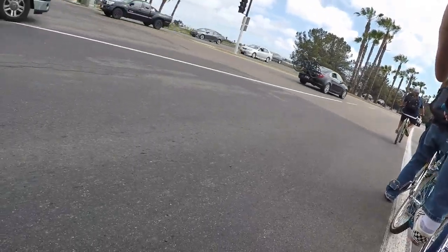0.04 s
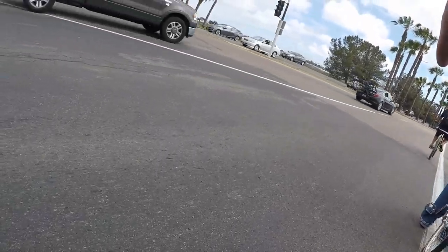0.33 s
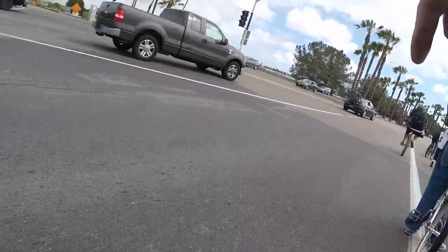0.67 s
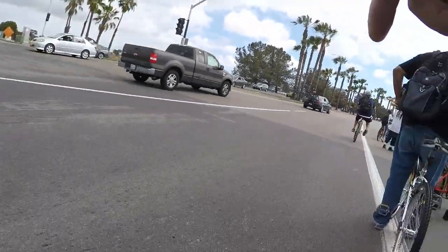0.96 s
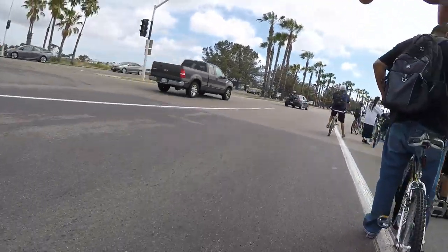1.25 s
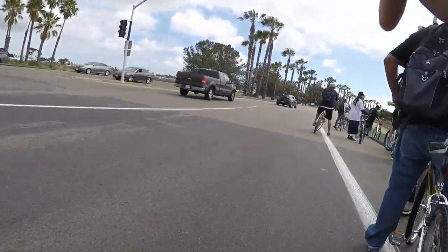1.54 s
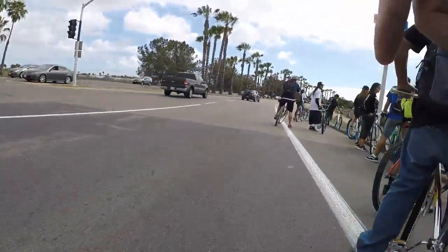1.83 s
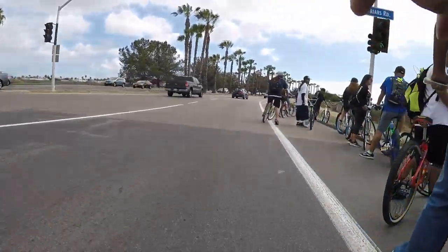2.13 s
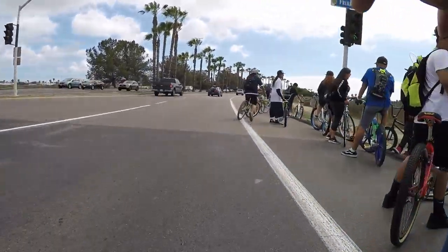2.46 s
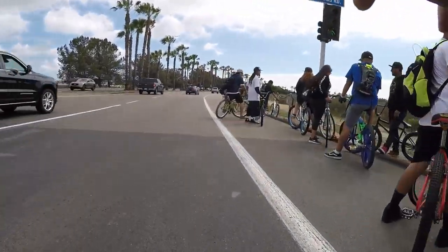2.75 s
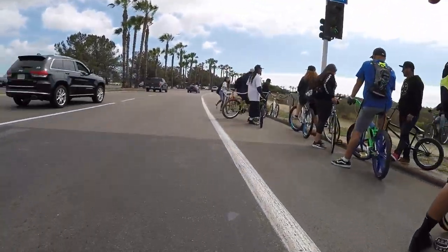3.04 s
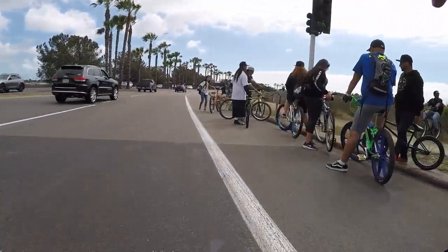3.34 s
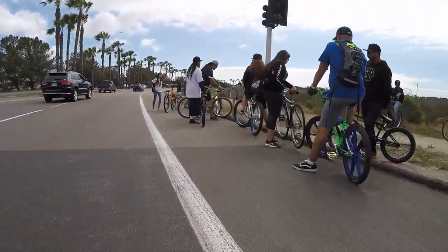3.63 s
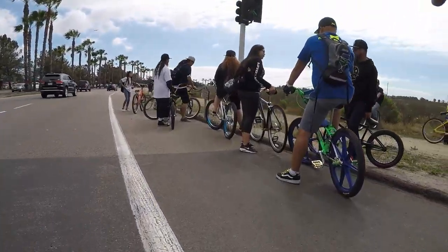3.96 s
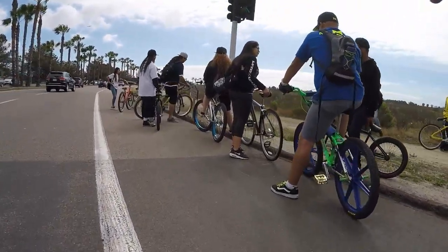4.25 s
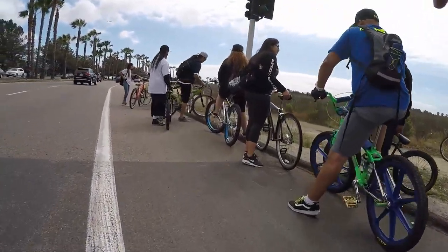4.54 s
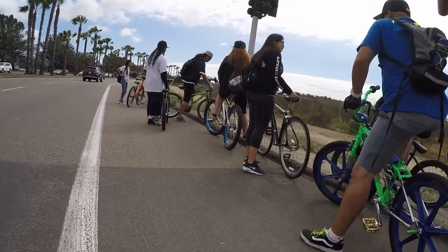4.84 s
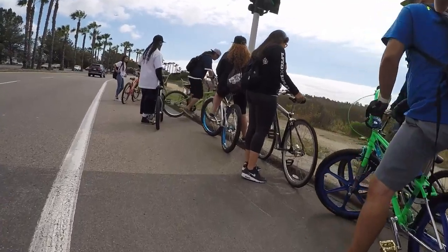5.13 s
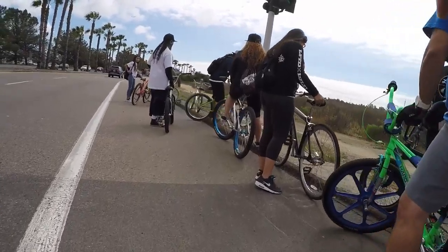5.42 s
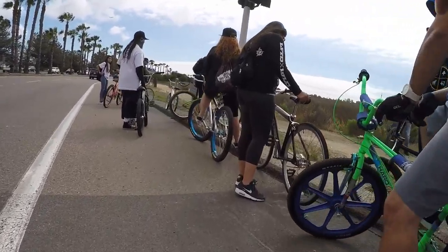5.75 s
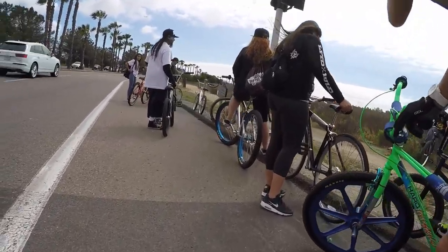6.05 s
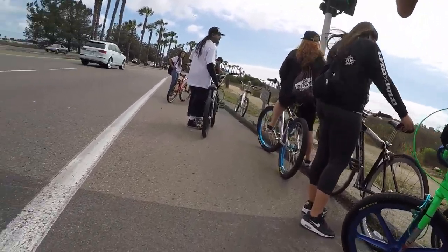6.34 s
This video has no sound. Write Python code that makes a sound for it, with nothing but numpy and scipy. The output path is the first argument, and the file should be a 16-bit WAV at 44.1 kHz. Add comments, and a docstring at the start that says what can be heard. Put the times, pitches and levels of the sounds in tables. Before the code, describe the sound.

Deep, fluttering wind buffets a microphone mounted on a coasting bicycle. Close by, the freewheel clicks with a slight metallic ring, accelerating to a steady buzz and then easing back to slower, hollower ticks. The brake squeaks faintly at the start, and one tiny rattle follows as the wheel reaches full speed. Tyres hum quietly on asphalt, and far-off road traffic hisses, a little louder early on.

```python
"""A bicycle freewheel ticks as the bicycle coasts past a junction, speeding up and slowing again.
Its pawls (small catches) snap over the ratchet teeth and make the hub and frame ring.
The brake squeaks faintly near the start, and a loose part rattles once.
Wind shakes the case of a small camera on the bicycle into a deep rumble.
Underneath, the tyres drone on the asphalt and distant traffic hisses."""
import sys
import numpy as np
from scipy import signal
from scipy.fft import rfft, irfft, next_fast_len
from scipy.io import wavfile
from scipy.ndimage import uniform_filter1d

SR = 44100
rng = np.random.default_rng(int(sys.argv[2]) if len(sys.argv) > 2 else 0)


def file_out(sig):
    """Save sig as 16-bit WAV at sys.argv[1]."""
    # one column per channel
    cols = np.atleast_2d(sig).T
    # limit, then scale
    lim = np.clip(cols, -1, 1)
    pcm = np.round(lim * 32767).astype(np.int16)
    wavfile.write(sys.argv[1], SR, pcm)


N = 286076

# The tone of distant traffic. Each row: frequency in Hz, level in dB.
TRAFFIC_TONE = [(200, -27), (500, -4), (1000, 1.5), (1500, 3), (2500, 4), (3400, -7), (4400, -12),
                (5100, -13.5), (6400, -15.5), (9000, -23.5), (15000, -27.5)]
# How loud the traffic is; a truck drives off early on. Each row: time in seconds, level in dB.
TRAFFIC_LEVEL = [(0, -41), (.45, -42.3), (.85, -39.8), (1.3, -46.5), (2, -50.5), (2.6, -48), (3.6, -52),
                 (4.6, -45.5), (6.49, -46)]
# The tone of the tyres' drone. Each row: frequency in Hz, level in dB.
TYRE_TONE = [(100, -13.5), (160, -12), (195, -8.5), (240, -5), (280, -8), (318, 5.5), (345, 0.5), (390, 3),
             (465, -13), (540, -8), (700, -10.5), (1500, -45.5)]
# Brief swells in the low drone and the gritty hiss.
# Each row: middle in seconds, half length in seconds, extra drone in dB, extra grit in dB.
LOW_SWELLS = [(0.63, .08, 8, 0), (0.95, .22, 4, 1), (2.0, .4, 2.5, 0), (2.6, .13, 1.5, 4),
              (3.3, .1, 1.5, 4), (5.95, .06, 5.5, 0), (6.37, .11, 6, 1.5)]
# The tone of road grit through the soft tyre. Each row: frequency in Hz, level in dB.
GRIT_TONE = [(300, -2.5), (950, 7.5), (1600, 0.5), (2600, -1.5), (3400, 3.5), (4400, -11)]
# How hard the grit shakes the frame. Each row: time in seconds, level in dB.
GRIT_LEVEL = [(0.3, -57), (0.9, -53.5), (1.9, -57.5), (2.15, -55), (3.9, -56), (4.5, -51.5), (5.4, -51.3),
              (6.4, -50)]
# How hard the wind pushes the camera case. Each row: time in seconds, level in dB.
WIND_PUSH = [(0, -18), (0.24, -16), (0.45, -23), (0.66, -10), (0.9, -9.5), (1.35, -12.5), (2.15, -11),
             (2.75, -11), (2.94, -16), (3.13, -10), (4.0, -14), (4.28, -11), (4.6, -14), (4.9, -9),
             (5.08, -18), (5.5, -11), (5.7, -17), (6.15, -12.5), (6.49, -17)]
# The tone of the churning air round the case. Each row: frequency in Hz, level in dB.
TURBULENCE_TONE = [(10, -24), (22, 3.5), (35, -1.5), (58, 4.5), (80, -7.5), (110, -19), (160, -30),
                   (300, -38.5), (800, -86)]
# How loud that churning air is. Each row: time in seconds, level in dB.
TURBULENCE_LEVEL = [(0.2, -27), (0.8, -23), (1.7, -27.5), (3.2, -27), (3.9, -24), (4.6, -26), (5.2, -32),
                    (6.2, -24)]
# Brake squeaks. Each row: middle in seconds, length in seconds, pitch in Hz, level in dB,
# waver as a share of the pitch.
SQUEAKS = [(0.01, 0.08, 2880, -39, 0.011), (0.008, 0.092, 2560, -43, 0.0095),
           (0.187, 0.12, 2060, -46, 0.02), (0.27, 0.27, 2630, -42, 0.03), (0.638, 0.1, 2500, -31, 0.0029)]
# A loose metal part. One row: start and end in seconds, knocks a second, pitch in Hz,
# ring time in seconds, level in dB.
RATTLE = (2, 2.155, 149.5, 3927, .007, -35.5)
# How fast the wheel coasts. Each row: time in seconds, ratchet teeth passing a second.
WHEEL_SPEED = [(0.0, 2.58), (0.64, 19.25), (0.99, 34.39), (1.15, 37.09), (1.25, 29.76), (1.69, 33.96),
               (2.04, 47.11), (2.23, 40.73), (2.33, 45.29), (2.6, 40.19), (2.65, 45.59), (3.91, 38.56),
               (4.25, 34.07), (4.33, 29.42), (4.83, 32.78), (5.18, 27.69), (5.36, 27.72), (5.49, 21.7),
               (5.67, 22.94), (5.88, 15.69), (5.95, 18.62), (6.49, 18.0)]
# How hard the pawls hit; a fast wheel leaves them less time to drop, so they hit more lightly.
# Each row: time in seconds, level in dB.
PAWL_FORCE = [(0.3, -21.3), (0.55, -19), (0.85, -21), (1.05, -21.5), (1.25, -23.5), (1.6, -22.5),
              (2.05, -27.8), (3.7, -27.8), (4.7, -23.5), (5.7, -24.7), (6.2, -20)]
# A second pawl falls out of step. Each row: time in seconds, level in dB.
STRAY_SNAPS = [(4.321, -25), (4.529, -29)]
# The notes of the hub, frame and camera mount. Each row: pitch in Hz, ring time in seconds,
# level in dB, extra dB each time the speed doubles, direction of swing (1 or -1).
FRAME_MODES = [(700, 0.03, -16, 0, 1), (801, 0.07, -16, -1.5, 1), (925, .05, -6.5, 3.5, 1),
               (967, 0.065, -13, 4, 1), (1215, 0.033, -2, -0.5, -1), (1251, .022, -1, -1, 1),
               (1339, 0.014, -3.5, -0.5, -1), (1642, 0.031, -1.5, 3, -1), (1744, 0.016, -10.5, 7, 1),
               (1880, 0.049, -11, 1.5, 1), (2065, 0.04, -13.5, 0, 1), (2243, 0.013, -5.5, 2, 1),
               (2383, 0.023, -4, -2.5, 1), (2525, 0.013, -4.5, -1.5, -1), (2774, .022, -6.5, -2, -1),
               (3083, 0.013, -8.5, 0, -1), (3515, 0.036, -20, 4.5, -1), (3955, 0.013, -2.5, 2.5, 1),
               (4250, 0.016, -2.5, 0.5, 1), (4334, 0.0089, -0.5, 4, -1), (4607, 0.021, -15.5, -1.5, -1)]
# Two notes in each snap: the bright one leads as the bicycle sets off, the hollow one as it slows.
# Each row: time in seconds, hollow level in dB, bright level in dB.
NOTE_LEVELS = [(0, 1, 16), (.55, 3, 19), (1.3, 2, 13.5), (2, 3, 0), (5.3, 4, 0), (5.8, 10, 0),
               (6.15, 17, 4)]
# The tone of a snap heard through the air. Each row: frequency in Hz, level in dB.
SNAP_TONE = [(400, -28), (1200, -3), (2500, 7.5), (4400, 10), (5200, -8), (6400, -3.5), (7300, -9.5),
             (9000, -16), (12000, -15.5), (13000, -21), (15000, -15)]
# The notes of the pawls themselves. Each row: pitch in Hz, ring time in seconds, level in dB.
PAWL_MODES = [(6170, 0.023, -5), (8180, 0.022, -17), (11830, .025, -10), (14700, .02, -8)]

CRUISE_TEETH_PER_S = 36
TIME = np.arange(N) / SR


def undb(db):
    """Turn decibels into a number to multiply by."""
    return 10 ** (np.asarray(db) / 20)


def unit(x):
    """Scale a signal so that its average size (rms) is 1."""
    return x / np.sqrt(np.mean(x ** 2))


def curves(table):
    """Join a timed table's rows with straight lines: one curve for each column after the time."""
    seconds, *columns = np.transpose(table)
    return [np.interp(TIME, seconds, column) for column in columns]


def colour(x, tone):
    """Filter a signal by a tone table; white noise would keep its overall power."""
    size = next_fast_len(N + SR // 4, real=True) // 2 * 2
    hz, db = np.transpose(tone)
    bin_hz = np.fft.rfftfreq(size, 1 / SR)
    gain = unit(undb(np.interp(np.log(bin_hz + 1), np.log(hz), db)))
    # fold the filter so that it rings only after a sound, never before
    cepstrum = irfft(np.log(gain))
    cepstrum[1:size // 2] *= 2
    cepstrum[size // 2 + 1:] = 0
    return irfft(rfft(x, size) * np.exp(rfft(cepstrum)))[:N]


def noise(tone):
    """Noise with the given tone and an average size of 1."""
    return unit(colour(rng.standard_normal(N), tone))


def wander(rate):
    """A smooth random curve of average size 1 that changes `rate` times a second."""
    hold = max(int(SR / rate), 1)
    steps = np.repeat(rng.standard_normal(N // hold + 1), hold)
    return unit(uniform_filter1d(uniform_filter1d(steps, hold), hold)[:N])


def mode(x, hz, ring_s):
    """One ringing note set off by x; it fades by 60 dB in its ring time, ring_s."""
    fade = np.exp(-np.log(1000) / (ring_s * SR))
    angle = 2 * np.pi * hz / SR
    feedback = [1, -2 * fade * np.cos(angle), fade * fade]
    return np.sqrt((1 - fade * fade) / 2) * signal.lfilter([1, 0, -1], feedback, x)


def traffic(flicker_db=1.5):
    """Distant traffic makes a hiss whose level flickers."""
    return noise(TRAFFIC_TONE) * undb(curves(TRAFFIC_LEVEL)[0] + flicker_db * wander(13))


def swells():
    """Two curves: the decibels that the brief swells add to the drone and to the grit."""
    return sum(np.outer(extra_db, np.exp(-((TIME - middle) / half_length) ** 2))
               for middle, half_length, *extra_db in LOW_SWELLS)


def tyres(level_db=-44.5, grain_db=1.5):
    """The tyres drone over coarse asphalt; the drone swells briefly now and then."""
    return noise(TYRE_TONE) * undb(level_db + swells()[0] + grain_db * wander(30))


def grit(flicker_db=1.5):
    """Road grit sends a fine shaking up through the tyres."""
    return noise(GRIT_TONE) * undb(curves(GRIT_LEVEL)[0] + swells()[1] + flicker_db * wander(23))


def wind(eddy_hz=43, wander_hz=5.0, throb=.8, throbs_per_s=32, gust_db=2.0, case_hz=68):
    """Eddies (swirls of air) shake the camera case while churning air flutters round it."""
    eddies = np.sin(2 * np.pi * np.cumsum(eddy_hz + wander_hz * wander(25)) / SR)
    throbs = np.tanh(1 + throb * wander(throbs_per_s))  # flat tops and short lulls
    push = unit(eddies * throbs) * undb(curves(WIND_PUSH)[0])
    # the case is too heavy to follow fast shaking
    rumble = signal.sosfiltfilt(signal.butter(2, case_hz, fs=SR, output="sos"), push)
    flutter = noise(TURBULENCE_TONE) * undb(curves(TURBULENCE_LEVEL)[0] + gust_db * wander(15))
    return rumble + flutter


def brake(rasp_db=4.0):
    """The pad grazes the wheel and sings briefly, sticking and slipping on a wavering pitch."""
    squeaks = 0
    for middle, length, hz, db, waver in SQUEAKS:
        touch = np.sqrt(np.maximum(1 - (2 * (TIME - middle) / length) ** 2, 0))
        tone = np.sin(2 * np.pi * np.cumsum(hz * (1 + waver * wander(600))) / SR)
        squeaks += undb(db) * touch * unit(tone * undb(rasp_db * wander(350)))
    return squeaks


def rattle(uneven_db=2.0, jitter=0.23, max_knocks=40):
    """A loose part knocks quickly and unevenly against its seat and rings on one high note."""
    start, end, rate, hz, ring_s, db = RATTLE
    gaps = np.abs(1 + jitter * rng.standard_normal(max_knocks)) / rate
    times = start + np.cumsum(gaps)
    force = undb(uneven_db * rng.standard_normal(max_knocks)) * (times < end)
    knocks = np.bincount((times * SR).astype(int), force, N)[:N]
    # the seat rings along with the part, so each knock swells softly
    ring = mode(mode(knocks, hz, ring_s), hz, ring_s)
    share_of_scene = (end - start) * SR / N
    return undb(db) * np.sqrt(share_of_scene) * unit(ring)


def camera_mount(x, edge_hz=4750):
    """The camera mount lets little of the frame's treble through."""
    return signal.sosfilt(signal.butter(10, edge_hz, fs=SR, output="sos"), x)


def frame(shaking):
    """The hub and frame ring; neighbouring notes that swing the same way leave a dip between them."""
    doublings = np.log2(curves(WHEEL_SPEED)[0] / CRUISE_TEETH_PER_S)
    ring = sum(swing * mode(shaking * undb(db + extra_db * doublings), hz, ring_s)
               for hz, ring_s, db, extra_db, swing in FRAME_MODES)
    return camera_mount(ring)


def chatter(blows, buzz_s):
    """Loose parts buzz for a moment after each blow."""
    fade = np.exp(-2 * np.log(1000) / (buzz_s * SR))
    energy = signal.lfilter([1 - fade], [1, -fade], blows ** 2)
    return np.sqrt(energy) * rng.standard_normal(N)


def snaps(start_tooth=.738):
    """Each passing tooth makes a snap, and strays join in. Gives times, seconds per tooth and dB."""
    teeth_per_s, force_db = curves(WHEEL_SPEED)[0], curves(PAWL_FORCE)[0]
    teeth = start_tooth + np.cumsum(teeth_per_s) / SR
    pass_s = np.interp(np.arange(1, teeth[-1]), teeth, TIME)
    stray_s, stray_db = np.transpose(STRAY_SNAPS)
    when = np.r_[pass_s, stray_s]
    tooth_s = 1 / np.interp(when, TIME, teeth_per_s)
    return when, tooth_s, np.r_[np.interp(pass_s, TIME, force_db), stray_db]


def pawl_blows(spread_s=.001, bounce_teeth=.125, lead_s=.0012, jitter_s=.0004,
               uneven_db=3.0, scatter_db=0.9, count=7):
    """At each tooth one pawl drops cleanly while others bounce round it, for longer on a slow wheel."""
    when, tooth_s, db = snaps()
    place = (np.arange(count) + rng.random((len(when), count))) / count - .5
    share = undb(uneven_db * rng.standard_normal(place.shape)) * rng.choice([-1, 1], place.shape)
    # the clean drop is alike on every tooth, so fast coasting gains a pitch
    clean = count // 2
    place[:, clean] = 0
    share[:, clean] = 2 / (tooth_s * CRUISE_TEETH_PER_S)
    share /= np.linalg.norm(share, axis=1, keepdims=True)
    late, harder = rng.standard_normal((2, len(when), 1))
    bounce_s = spread_s + bounce_teeth * tooth_s[:, None]
    times = when[:, None] - lead_s + jitter_s * late + place * bounce_s
    force = share * undb(db[:, None] + scatter_db * harder)
    samples = np.clip(times * SR, 0, N - 1).astype(int)
    return np.bincount(samples.ravel(), force.ravel(), N)


def freewheel(ring_db=17, chatter_db=-6, snap_db=5.5, fizz_db=5.7, ping_db=-10):
    """Pawl blows and road grit ring the frame; a thin snap and the pawls' ping come through the air."""
    blows = pawl_blows()
    knocks = blows + undb(chatter_db) * chatter(blows, buzz_s=0.038)
    ring = frame(undb(ring_db) * knocks + grit())
    hollow_db, bright_db = curves(NOTE_LEVELS)
    hollow = mode(blows * undb(hollow_db), hz=1170, ring_s=.022)
    bright = mode(blows * undb(bright_db), hz=2470, ring_s=.03)
    fizz = undb(fizz_db) * chatter(blows, buzz_s=0.034)
    snap = colour(undb(snap_db) * blows + fizz, SNAP_TONE)
    ping = sum(undb(db + ping_db) * mode(blows, hz, ring_s) for hz, ring_s, db in PAWL_MODES)
    return ring + camera_mount(hollow + bright) + snap + ping


def scene():
    """All the sounds add up at one microphone."""
    return (freewheel() + brake() + rattle() + wind() + tyres() + traffic())[None]


def record(dry):
    """The camera cuts off the highest treble."""
    top_hz = 15400
    return signal.sosfilt(signal.ellip(8, .2, 70, top_hz, fs=SR, output="sos"), dry)


dry = scene()
out = record(dry)
file_out(out)
```